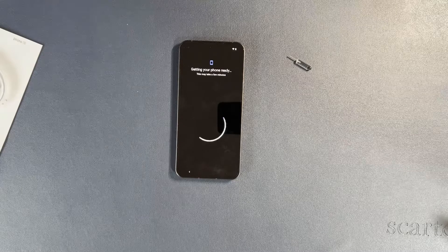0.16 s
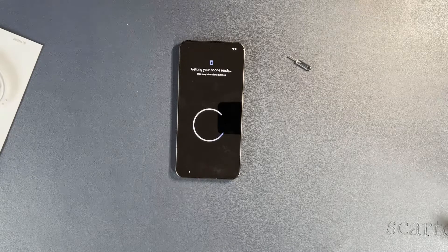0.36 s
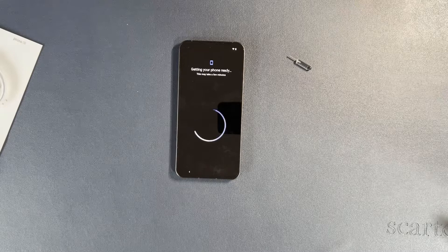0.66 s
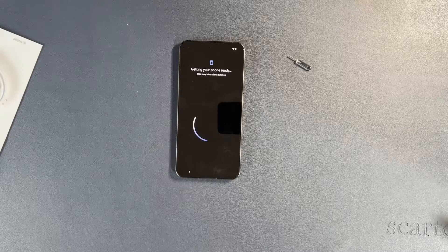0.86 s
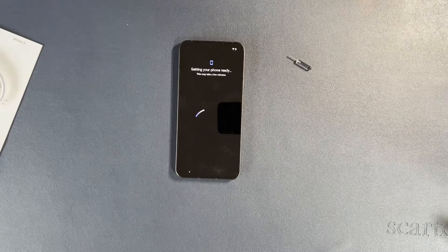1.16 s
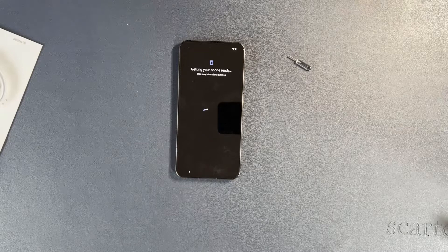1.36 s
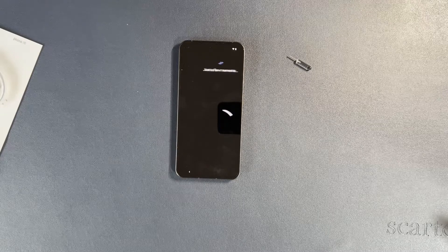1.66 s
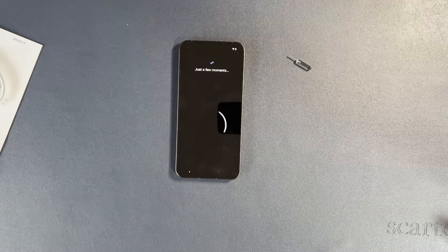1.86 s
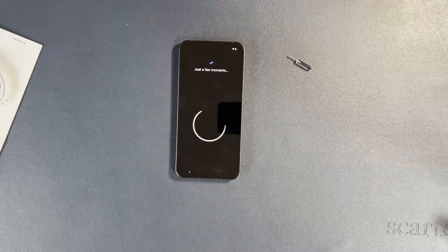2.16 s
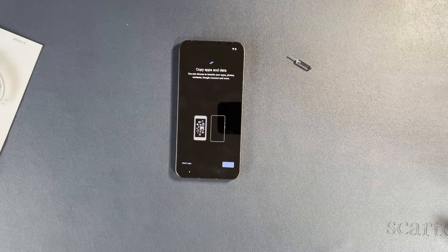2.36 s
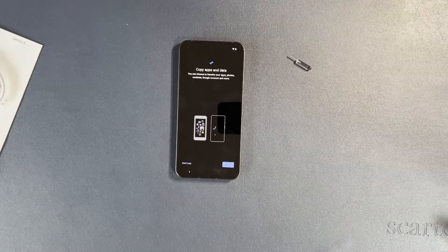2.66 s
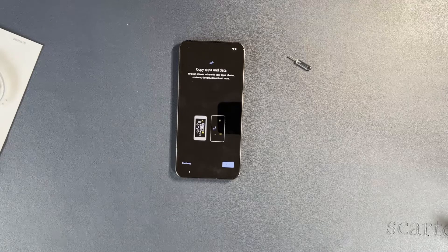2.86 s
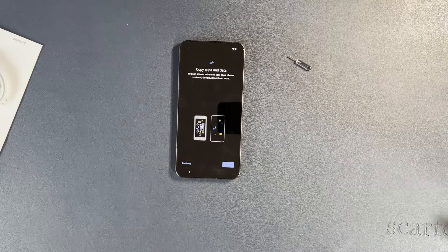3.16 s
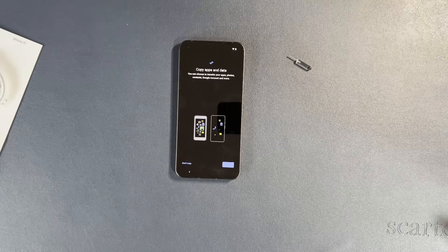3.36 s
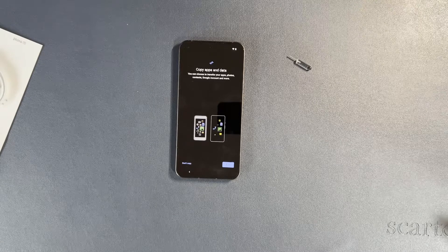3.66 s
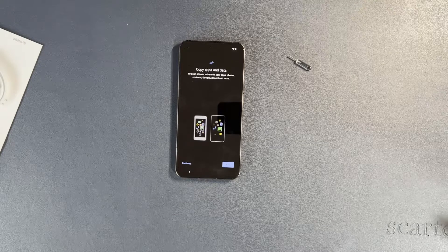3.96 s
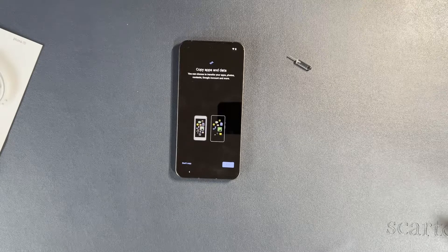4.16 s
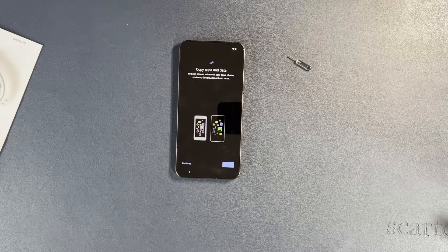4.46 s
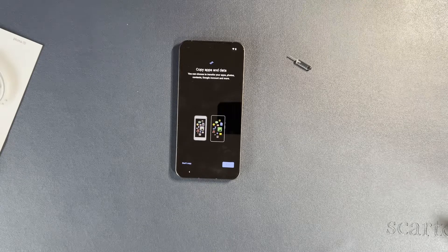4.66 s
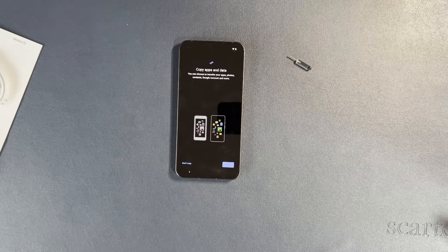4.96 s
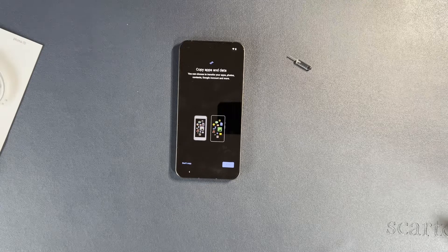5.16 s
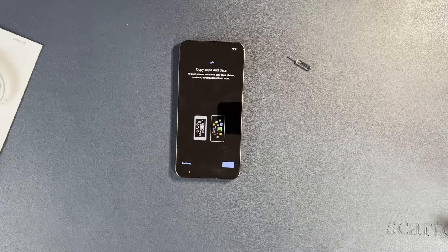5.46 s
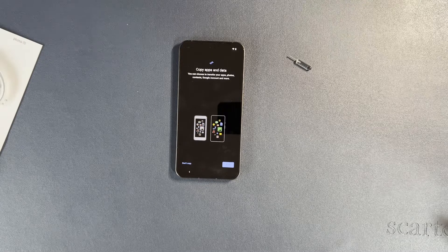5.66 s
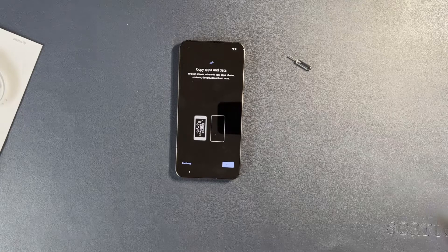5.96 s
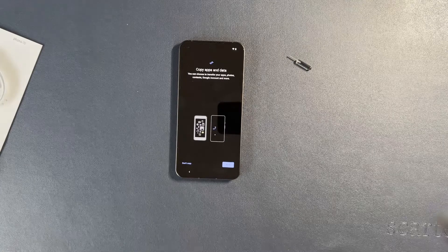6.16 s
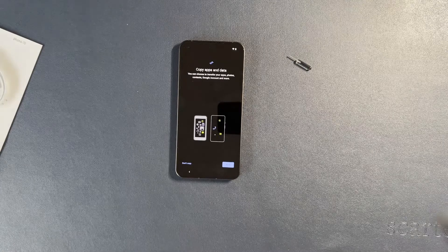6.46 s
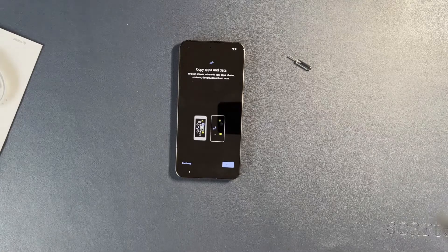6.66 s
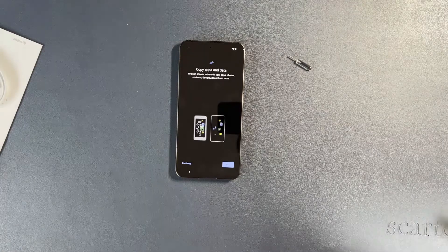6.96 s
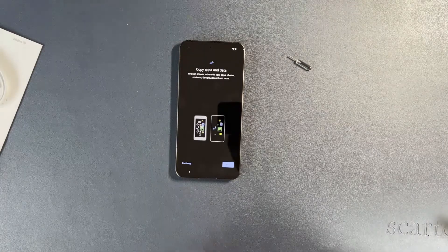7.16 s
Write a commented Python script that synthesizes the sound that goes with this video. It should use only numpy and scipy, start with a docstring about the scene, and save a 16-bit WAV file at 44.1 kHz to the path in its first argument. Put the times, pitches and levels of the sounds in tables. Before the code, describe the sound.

Small things are handled on a desk with clicks and brief scrapes, while a deep engine-like drone wavers quietly behind.

```python
"""From the start a low hum glides down, while light taps and short rubbing strokes handle small things on a desk.
A hollow knock stands out near 1.8 s; from about 4 s the contacts crowd together, and they thin out after 6.5 s.
Taps are noise bursts with resonances, rubs are shaped noise with crackle, bumps are a low desk resonance.
The hum, like engines through a wall, is two gliding sets of sines; its deep part is highest near 5.5 s, then
sinks, as its upper part climbs again. Mains hum and filtered noise fill the small, dry room throughout."""
import sys
import numpy as np
from scipy import signal
from scipy.fft import rfft, irfft, next_fast_len
from scipy.io import wavfile

SR = 44100
rng = np.random.default_rng(int(sys.argv[2]) if len(sys.argv) > 2 else 0)


def persist_wave(psi):
    """Save psi, clipped to +-1, as 16-bit WAV."""
    counts = np.round(np.clip(psi, -1, 1) * 32767).astype(np.int16)
    wavfile.write(sys.argv[1], SR, np.atleast_2d(counts).T)


N = 322490
TIME = np.arange(N) / SR
BANDS_HZ = 25 * 2 ** (np.arange(29) / 3)   # third-octave centres


# taps on small things: (t/s, relative level/dB, extra thud level/dB, extra treble level/dB,
# hardness: direct contact against room/dB, f of the touched spot/Hz, its tone level/dB)
TAPS = [(0.035, -49, -0.5, -18, -17, 1700, -18), (.315, -56.5, -19, -13, -4, 1770, -27),
        (.998, -55, -18, -20, 3, 1069, -16), (1.144, -52.5, 5.5, -6.5, -22, 2400, -7),
        (1.42, -41, -2.5, -15, -11, 3060, -6), (1.69, -65.5, 6, 8.5, -1, 7200, -5),
        (1.834, -26, -6.5, -12, 7, 960, -5), (1.8422, -34.5, 5, -19, 3, 920, 2),
        (1.975, -59, 0, -4, -6, 2553, -3.5), (2.564, -54, -5, -21, -17, 1310, -18),
        (2.608, -51.5, 4, -31, 2, 2030, -4.5), (2.806, -50.5, -11, -13, -4, 2530, -10),
        (3.036, -70, -8, 15.5, 3, 5500, -18), (3.215, -47.5, 0, 3.5, 3, 1020, -6.5),
        (3.4456, -35.5, 2, -6, -10, 3730, -5), (3.963, -43, 8.5, -3, -6, 2570, -9),
        (4.091, -63.5, 4, 9, 5, 3100, 10), (4.142, -59, -11, -9, 10, 3240, 1),
        (4.198, -49, -26, -11.5, -5, 1390, -13), (4.257, -61, -10, -11, 7, 2400, -7),
        (4.323, -50.5, -18, -3, -3, 1560, -7), (4.343, -58.5, -15, -8, 11, 2930, -5.5),
        (4.394, -58, -10, 6.5, 0, 4167, -4.5), (4.422, -57, -15, -15, -2, 2210, -1),
        (4.487, -51, -3, 1.5, 9, 1990, -12), (4.529, -37.5, -4.5, -7.5, 13, 1490, -7),
        (4.543, -32, -4, -12, 10, 2957, -4), (4.645, -52.5, 1.5, 1, 1, 2620, 5.5),
        (4.829, -55, -24, 6.5, -25, 2500, -17), (4.947, -53, -6, -2.5, -15, 2170, -21),
        (4.996, -71.5, -3, 17.5, 10, 8000, -7), (5.062, -61, -13, 8, 4, 3000, -10),
        (5.554, -60.5, -11, 3, 16.5, 7360, 6), (5.951, -57, -12, -10, 8, 3070, -2.5),
        (6.024, -50.5, -16, -10, 6, 1132, 2), (6.142, -49.5, -26, 0.5, -6, 2860, 2.5),
        (6.222, -60, 6, -1, 9.5, 1782, 2.5), (6.549, -43.5, -6, -38, 2.5, 1900, -7.5),
        (6.575, -43.5, 7.5, -49, -11, 1715, -14), (6.937, -64.5, -18, -2, 16.5, 1600, -3)]
# where thud, body, clack and treble levels apply: (f/Hz)
TAP_TILT_HZ = [480, 1150, 3200, 7500]
# colour common to all taps: (f/Hz, relative band level/dB)
TAP_COLOUR = [(200, -19.5), (310, -15.5), (420, -11), (600, -13), (800, -9.5), (1000, -9.5), (1250, -9),
              (1600, -10), (2100, -8.5), (3000, -8), (4200, -5), (5200, -10.5), (6300, -7.5), (8000, -9.5),
              (10000, -10.5), (12500, -8), (15000, -24)]
# side from which the taps come: (f/Hz, left-over-right level/dB)
TAP_PAN = [(200, -2), (500, -1), (1200, -1), (3000, 0.8), (8000, 0)]
# left-right likeness of taps and room tone: (f/Hz, correlation, limited to -1..1)
FAR_LIKENESS = [(60, .999), (120, 0.99), (240, 0.7), (400, 0.35), (800, -0.27), (1400, 0.57), (2600, 0.8),
                (4500, 0.16), (8000, 0.98), (11000, -0.65), (14000, -0.87)]
CLACK_DB, CLACK_FOLLOWS = 0.5, 0.24   # around 3 kHz: lift, and share of the extra treble
ROOM_T60_S, LATE_T60_S, LATE_DB = 0.23, 0.96, -43


def taps(crack_t60=0.018, crack_db=-1, room_db=-4.0, snap_db=3, rise_s=0.0009, lump_db=2.5):
    """Each contact is a snap, a few milliseconds of crack and the room's lumpy answer."""
    s, db, thud_db, treble_db, hardness_db, _, _ = np.transpose(TAPS)
    clack_db = db + CLACK_DB + CLACK_FOLLOWS * treble_db
    levels = np.transpose([db + thud_db, db, clack_db, db + treble_db])
    noise = reflections(rng.standard_normal((2, 2, N)))
    out = np.zeros((2, N))
    keep = np.exp(-1 / (rise_s * SR))   # the contact takes a moment to build up
    for k, hz in enumerate(BANDS_HZ[BANDS_HZ > 190]):
        own_db = [np.interp(np.log(hz), np.log(TAP_TILT_HZ), row) for row in levels]
        size = from_db(own_db + at_hz(TAP_COLOUR, hz))
        direct = size * from_db(hardness_db)
        crack = fade(clicks(s, (direct * from_db(crack_db)) ** 2), crack_t60)

        # a main decay and a faint longer one
        heard = clicks(s, (size * from_db(room_db)) ** 2)
        room = fade(heard, ROOM_T60_S) + fade(heard, LATE_T60_S) * from_db(LATE_DB) ** 2
        lumpy_room = room * flutter(lump_db, 110) ** 2
        envelope = signal.lfilter([1 - keep], [1, -keep], np.sqrt(crack + lumpy_room))

        # neighbouring bands snap with opposite sign
        impulse = clicks(s, direct * from_db(snap_db) * np.sqrt(SR / hz))
        snap = (-1) ** k * third_octave(impulse, hz)
        burst = envelope * stereo_band(noise[k % 2], hz, FAR_LIKENESS)
        out += (snap + burst) * pan(at_hz(TAP_PAN, hz))
    return out


# lean of the tap tones: (f/Hz, left-over-right level/dB)
TONE_PAN = [(1000, -1.5), (3500, -0.5)]


def pitched_ticks(level_db=-2.5, width_hz=260, widening=0.13, crack_t60=0.022, tail_db=-9,
                  tail_t60=0.23, apart=0.8):
    """Each tap drives one broad resonance of the touched spot, and the room carries it on."""
    t = np.arange(int(.2 * SR)) / SR
    envelope = from_db(-60 * t / crack_t60) + from_db(tail_db - 60 * t / tail_t60)
    out = np.zeros((2, N + len(t)))
    for s, db, *_, hz, tone_db in TAPS:
        shared = rng.standard_normal(len(t))
        burst = envelope * (shared + apart * rng.standard_normal((2, len(t))))
        # higher resonances are broader; two equal stages in a row
        t60 = np.log(1000) / (np.pi * (width_hz + widening * hz))
        tone = np.diff(ring(ring(burst, hz, t60), hz, t60), prepend=0)
        tone = tone / np.sqrt(np.mean(tone[:, t < .016] ** 2))   # unit power over its onset
        start = int(s * SR)
        gain = from_db(db + tone_db + level_db) * pan(at_hz(TONE_PAN, hz))
        out[:, start:start + len(t)] += tone * gain
    return out[:, :N]


# modes of the hollow object: (f/Hz, relative level/dB, t60/s, left-over-right level/dB)
OBJECT_MODES = [(277, -16.5, 0.35, 3), (687.4, -12.5, 0.2, -2), (740, -29, 0.13, 2),
                (818, -10.5, 0.19, -13.5), (911, -7, 0.087, 8), (976, -12.5, 0.25, -6),
                (1087, -18, 0.22, 1), (1139, -6, 0.15, 4), (1487, -9.5, 0.2, -1), (1584, -12.5, 0.24, 3),
                (1725, -10, .16, 4), (2090, -6.5, 0.14, 3), (2760, -22.5, 0.12, 22.5),
                (3150, -16, 0.078, 0), (3520, -23, .1, 19), (3720, -11.5, 0.092, 0), (4770, -17, .14, 3)]
RING_PER_HARDNESS = 0.17   # harder contacts ring the object more (dB per dB)


def hollow_object(ring_db=-5, scatter_db=1, skew_cycles=0.042):
    """Every tap also rings the object's modes as decaying sines, each with a strength of its own."""
    s, db, _, _, hardness_db, _, _ = np.transpose(TAPS)
    strike_db = db + RING_PER_HARDNESS * hardness_db + ring_db
    out = np.zeros((2, N))
    for hz, mode_db, t60, pan_db in OBJECT_MODES:
        sizes = from_db(strike_db + mode_db + scatter_db * rng.standard_normal(len(s)))
        skew = rng.choice([-1, 1]) * skew_cycles
        for side, sign in enumerate((1, -1)):
            path_s = (1 + sign * skew) / hz   # each mode reaches left and right out of step
            out[side] += from_db(sign * pan_db / 2) * ring(clicks(s + path_s, sizes), hz, t60)
    return out


# rubbing strokes: (start t/s, length/s, relative scrape level/dB, relative hiss level/dB)
STROKES = [(0, 0.17, -64, -68), (0.367, .07, -71.5, -82), (0.842, 0.05, -69.5, -85),
           (1.015, 0.053, -66, -90), (1.273, 0.037, -67, -73), (1.429, .008, -67, -78),
           (1.828, .02, -59.5, -63.5), (2.199, 0.11, -63, -64), (2.374, 0.27, -72.5, -70.5),
           (2.728, 0.056, -62.5, -59.5), (3.05, 0.087, -71, -65), (3.213, 0.015, -60, -69),
           (3.334, 0.25, -64, -60.5), (3.617, 0.12, -71, -68.5), (3.79, 0.3, -67.5, -78),
           (4.341, 0.12, -74, -61), (4.518, 0.032, -52.5, -72), (4.643, .015, -63, -70),
           (4.792, 0.019, -64, -67), (4.838, .04, -60.5, -60), (5.08, 0.038, -56.5, -75),
           (5.143, 0.036, -61, -53), (5.217, 0.027, -58, -59.5), (5.404, 0.17, -69, -67),
           (5.564, 0.15, -67.5, -65.5), (5.971, .23, -66, -64.5), (6.14, 0.017, -68, -63),
           (6.246, 0.043, -55, -57.5), (6.306, 0.084, -56.5, -55), (6.473, 0.12, -62.5, -60.5),
           (6.63, 0.16, -70.5, -62.5), (6.969, 0.18, -79, -66.5)]
# light sliding contact between strokes: (t/s, relative scrape level/dB, relative hiss level/dB)
SLIDING = [(0, -75, -85.5), (2.95, -79.5, -82), (3.2, -71.5, -84), (4.3, -66, -67.5), (5.5, -72, -73),
           (6.5, -73.5, -68), (7.1, -74, -74.5), (7.31, -87, -89)]
STROKE_ATTACK_S, STROKE_RELEASE_S = .025, 0.023   # time from the held level to 1/e
STROKE_SAG_DB_PER_S = 16.5   # pressure eases along a stroke


def rub_strength():
    """Gains of scrape and hiss: each stroke swells, sags and dies away above the light sliding contact."""
    power = from_db(in_time(SLIDING)) ** 2
    for start, length, scrape_db, hiss_db in STROKES:
        early = np.maximum(start - TIME, 0)
        late = np.maximum(TIME - start - length, 0)
        decay = (early / STROKE_ATTACK_S) ** 2 + late / STROKE_RELEASE_S
        envelope = np.exp(-np.minimum(decay, 20))
        sag_db = STROKE_SAG_DB_PER_S * np.clip(TIME - start, 0, length)
        power = power + (from_db([scrape_db - sag_db, hiss_db - sag_db]) * envelope) ** 2
    return np.sqrt(power)


# colour of the rubbing: (f/Hz, relative band level/dB)
RUB_COLOUR = [(350, -13.5), (600, -7.5), (1200, -10), (2200, -9), (4200, -7.5), (5400, -11.5), (7500, -8.5),
              (10000, -14), (12500, -2), (15000, -34)]
# left-right likeness of the rubbing: (f/Hz, correlation, limited to -1..1)
NEAR_LIKENESS = [(300, 1), (700, -0.8), (1300, 0.57), (2400, 0.81), (4400, 0.26), (8000, 1), (11000, -0.68),
                 (14000, -1.15)]


def rubbing(scrape, hiss, level_db=-0.66, catch_db=2.0, patchy_db=2.5):
    """Surfaces slide with a dry hiss under uneven pressure; the treble follows its own strength."""
    friction = reflections(rng.standard_normal((2, 2, N)), strength=0.15)
    out = 0
    for k, hz in enumerate(BANDS_HZ[BANDS_HZ > 300]):
        treble = np.clip(at_hz([(2800, 0.11), (6000, 0.88)], hz), 0, 1)   # share of hiss
        strength = (1 - treble) * scrape + treble * hiss
        gain = strength * from_db(at_hz(RUB_COLOUR, hz)) * flutter(patchy_db, 45)
        out = out + gain * stereo_band(friction[k % 2], hz, NEAR_LIKENESS)
    return out * from_db(level_db) * flutter(catch_db, 45)


def crackle(scrape, hiss, level_db=3.5, per_s=240, cycles=16, spread_db=3, count=16):
    """While surfaces slide, small catches make dry specks: short rings at many pitches."""
    out = np.zeros((2, N))
    for hz in np.geomspace(1200, 7500, count):
        born = np.flatnonzero(rng.random(N) < per_s / count / SR)
        strength = (scrape if hz < 4800 else hiss)[born]
        extra_db = spread_db * np.minimum(rng.exponential(1, len(born)), 3)
        sizes = strength * from_db(level_db + extra_db)
        for side in range(2):
            uneven = sizes * rng.uniform(.2, 1.4, len(born))
            out[side] += ring(clicks(born / SR, uneven), hz, cycles / hz)
    return out


# soft bumps of the desk top: (centre t/s, level/dB, Gaussian spread/s)
BUMPS = [(0.652, -65, 0.089), (1.173, -55, 0.019), (2.713, -54, 0.0094), (3.328, -52.5, 0.013),
         (3.38, -59.5, 0.019), (3.899, -51, 0.03), (5.193, -71, 0.13), (6.609, -48.5, .035),
         (6.714, -50, 0.033)]
DESK_HZ, DESK_T60_S = 244.4, 0.05   # the t60 is that of each of two stages


def desk_bumps():
    """Soft pushes stir only the desk top's low resonance, as noise through two ringing stages."""
    push = sum(from_db(db) * np.exp(-.5 * ((TIME - s) / spread) ** 2) for s, db, spread in BUMPS)
    stirred = ring(rng.standard_normal(N), DESK_HZ, DESK_T60_S)
    return push * rms_one(ring(stirred, DESK_HZ, DESK_T60_S))


# deep drone: (t/s, f/Hz, relative level/dB)
DEEP_DRONE = [(0, 74, -54), (.3, 71.36, -49.5), (.75, 71.34, -50.5), (1.19, 66.5, -49), (1.6, 68, -56),
              (2.25, 67.5, -51.5), (2.75, 66.4, -61.5), (3.55, 71.5, -63), (3.92, 71.88, -45),
              (4.25, 70.64, -65), (4.5, 71.5, -46), (4.77, 72.73, -67), (5, 74.7, -52.5),
              (5.52, 77.35, -45.5), (6.15, 74.6, -52), (6.5, 71.14, -48), (6.86, 68.4, -43.5),
              (7.31, 67.6, -50.5)]
# upper drone, slowing and picking up again: (t/s, f/Hz, relative level/dB)
UPPER_DRONE = [(0, 142.8, -62), (1.1, 140.6, -61.5), (1.8, 132.4, -61), (2.4, 126.4, -58),
               (3.85, 116.8, -58.5), (4.45, 118.8, -63), (5.1, 128.2, -55.5), (7.31, 138.7, -62)]
# engine orders of the deep drone: (multiple of its f, relative level/dB)
DEEP_ORDERS = [(.5, -12), (1, 0), (2, -18.5)]
# engine orders of the upper drone: (multiple of its f, relative level/dB)
UPPER_ORDERS = [(.5, -1), (.75, -16), (1, 1), (1.25, -9), (1.5, -12), (2, -17)]


def drone(curve, orders, level_db, waver_db):
    """A few low engine orders that glide together and waver in strength."""
    hz, db = in_time(curve)
    phase = 2 * np.pi * np.cumsum(hz) / SR
    lines = 0
    for multiple, order_db in orders:
        sine = np.sin(multiple * phase + rng.uniform(0, 2 * np.pi))
        lines = lines + from_db(order_db) * flutter(waver_db, 14) * sine
    return np.sqrt(2) * from_db(db + level_db) * lines


# faint mains hum: (f/Hz, RMS level/dB)
MAINS = [(100, -69.5), (300, -81.5)]


def mains_hum():
    """Mains hum as steady sines."""
    return sum(np.sqrt(2) * from_db(db) * np.sin(2 * np.pi * hz * TIME) for hz, db in MAINS)


# still room: (f/Hz, relative band level/dB)
ROOM_TONE = [(25, -92), (37, -60), (48, -68.5), (65, -58.5), (85, -57), (130, -61.5), (180, -68.5),
             (250, -73.5), (330, -78), (500, -79.5), (1000, -81.5), (3000, -88), (6000, -107), (12500, -80),
             (13500, -114)]
# slow swell of the rumble: (t/s, relative level/dB)
RUMBLE_SWELL = [(0, -2), (3, -1), (5, -0.5), (6.2, -1), (7.3, 0)]


def room_tone():
    """Spectrum-shaped noise: far rumble that slowly swells, under a faint steady hiss."""
    size = next_fast_len(N)
    hz = np.maximum(np.fft.rfftfreq(size, 1 / SR), 1)
    mid, side = rfft(rng.standard_normal((2, size)))
    air = mid_side(mid, side, at_hz(FAR_LIKENESS, hz))
    band_width = np.maximum(hz, 25) * (2 ** (1 / 6) - 2 ** (-1 / 6))   # third octave
    air = air * from_db(at_hz(ROOM_TONE, hz)) * np.sqrt(SR / band_width) / 2
    rumble, hiss = (irfft(air * part, size)[:, :N] for part in (hz < 180, hz >= 180))
    return rumble * from_db(in_time(RUMBLE_SWELL)[0]) + hiss


def from_db(db):
    """Decibels to gain."""
    return 10 ** (np.asarray(db) / 20)


def rms_one(x):
    """Scale to unit power."""
    return x / np.sqrt(np.mean(x ** 2) + 1e-20)


def in_time(rows):
    """Each column of a curve, sample by sample."""
    s, *columns = np.transpose(rows)
    return [np.interp(TIME, s, c) for c in columns]


def at_hz(points, hz):
    """Read a spectrum on a log-frequency axis."""
    f, value = np.transpose(points)
    return np.interp(np.log(hz), np.log(f), value)


def pan(db):
    """Left and right gains that differ by db."""
    return from_db(db * np.array([[.5], [-.5]]))


def third_octave(x, hz):
    """Band-pass a third of an octave wide."""
    edges = hz * 2 ** (np.array([-1, 1]) / 6)
    return signal.sosfilt(signal.butter(2, edges, "band", fs=SR, output="sos"), x + 1e-18)


def mid_side(mid, side, likeness):
    """Two unrelated signals become left and right with the given correlation."""
    alike = np.clip(likeness, -1, 1)
    return np.sqrt(1 + alike) * mid + np.sqrt(1 - alike) * side * np.array([[1], [-1]])


def stereo_band(pair, hz, likeness):
    """One stereo band of unit power, as alike left and right as that pitch is."""
    mid, side = third_octave(pair, hz)
    return rms_one(mid_side(mid, side, at_hz(likeness, hz)))


def clicks(times, sizes):
    """Single-sample impulses."""
    return np.bincount((times * SR).astype(int), sizes, N)[:N]


def fade(energy, t60):
    """Energy that dies by 60 dB in t60."""
    return signal.lfilter([1], [1, -10 ** (-6 / (t60 * SR))], energy + 1e-22)


def ring(x, hz, t60):
    """Two-pole resonator: a unit click sets a decaying sine of starting height 1 ringing."""
    r, w = from_db(-60 / (t60 * SR)), 2 * np.pi * hz / SR
    return signal.lfilter([0, np.sin(w)], [1, -2 * r * np.cos(w), r * r], x + 1e-18)


def reflections(x, strength=0.19):
    """Bounces off the desk and nearby things comb the spectrum."""
    for delay_s in (.0031, .0047, .0079):
        x = x + strength * np.roll(x, int(delay_s * SR), axis=-1)
    return x


def flutter(spread_db, per_s):
    """A gain that wanders around 1, with per_s random turning points a second."""
    knots = from_db(spread_db * rng.standard_normal(int(8 * per_s) + 2))
    return np.interp(TIME * per_s, np.arange(len(knots)), knots)


def scene():
    """Handling sounds over the hum and the still room."""
    scrape, hiss = rub_strength()
    contacts = taps() + pitched_ticks() + hollow_object()
    sliding = rubbing(scrape, hiss) + crackle(scrape, hiss)
    bumps = desk_bumps() * pan(-1.8)
    deep = drone(DEEP_DRONE, DEEP_ORDERS, level_db=1.5, waver_db=1.6)
    upper = drone(UPPER_DRONE, UPPER_ORDERS, level_db=-0.5, waver_db=4.0)
    return contacts + sliding + bumps + deep + upper + mains_hum() + room_tone()


def record(dry):
    """The top is cut steeply above 16 kHz by an elliptic low-pass."""
    return signal.sosfilt(signal.ellip(10, .1, 80, 16000, fs=SR, output="sos"), dry)


dry = scene()
out = record(dry)
persist_wave(out)
```